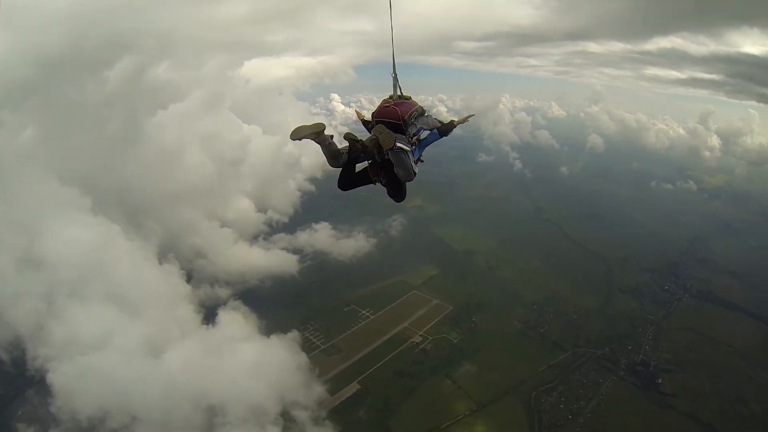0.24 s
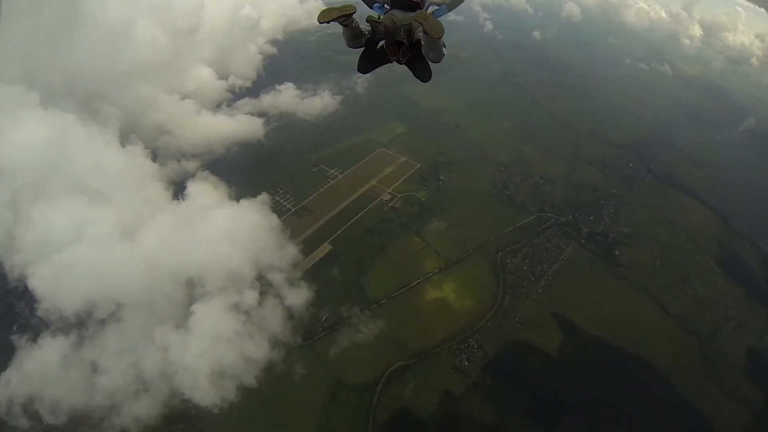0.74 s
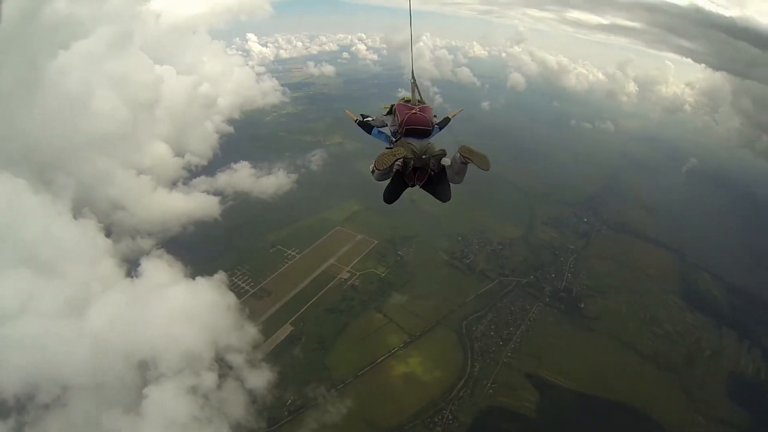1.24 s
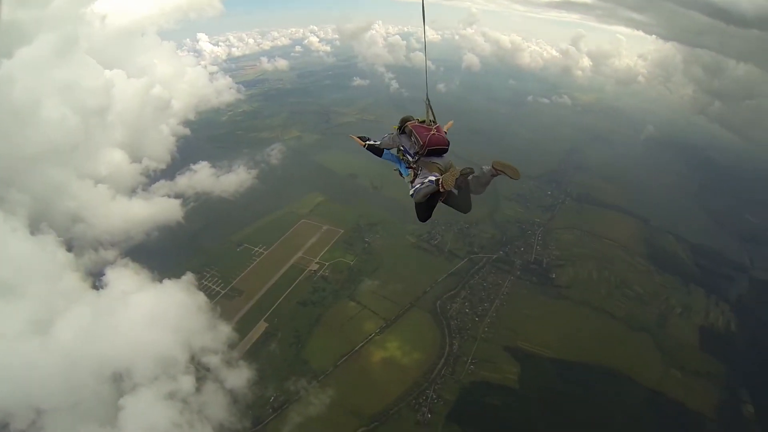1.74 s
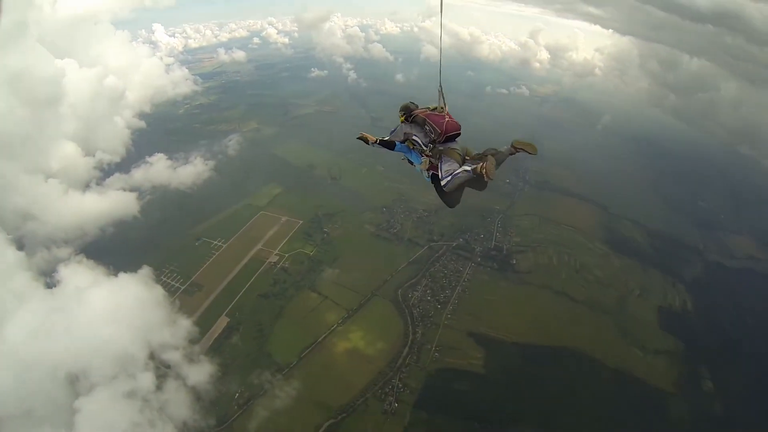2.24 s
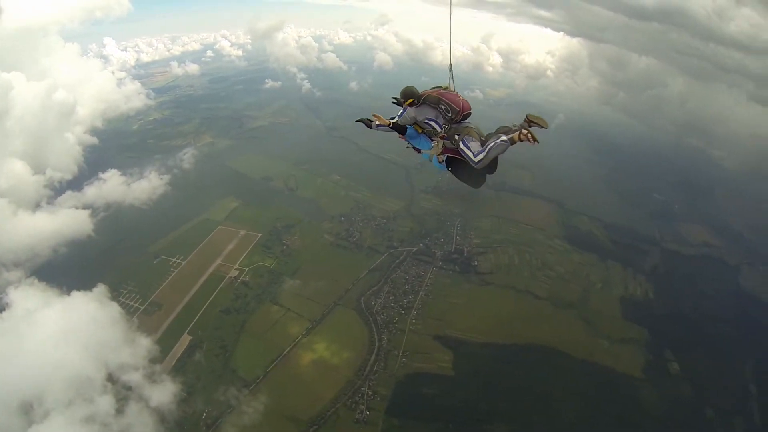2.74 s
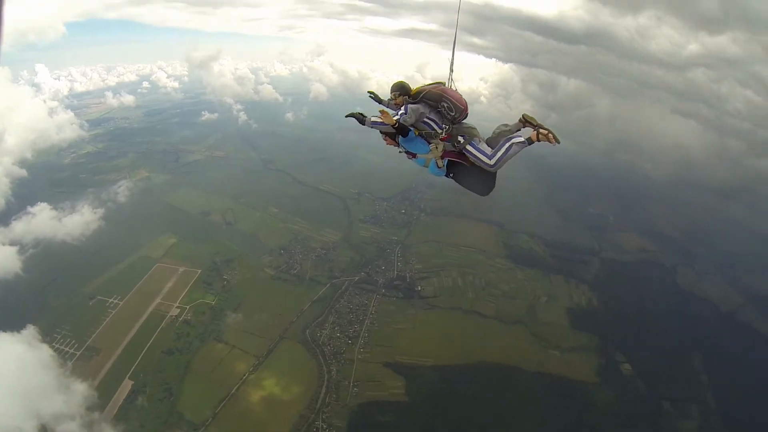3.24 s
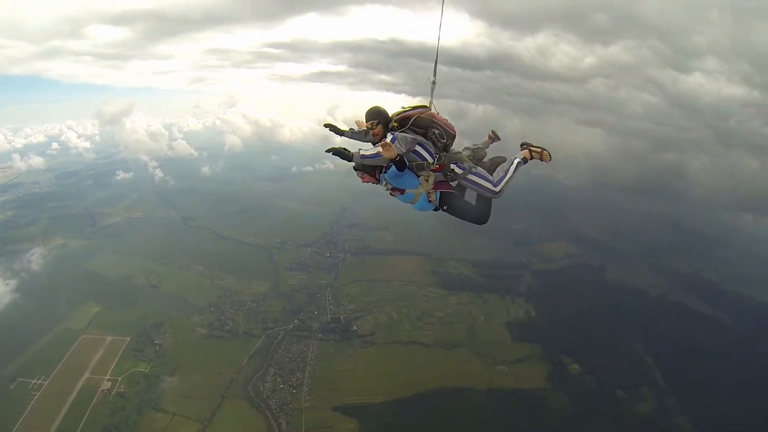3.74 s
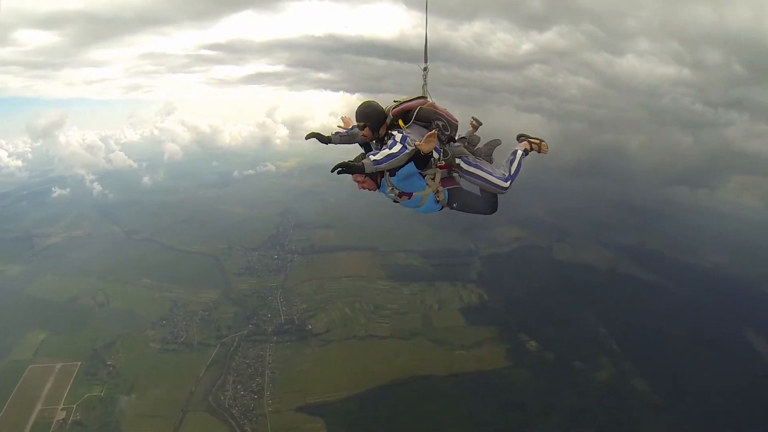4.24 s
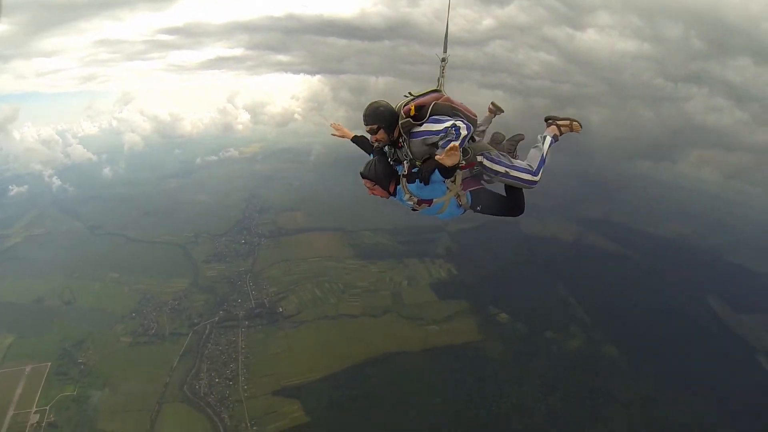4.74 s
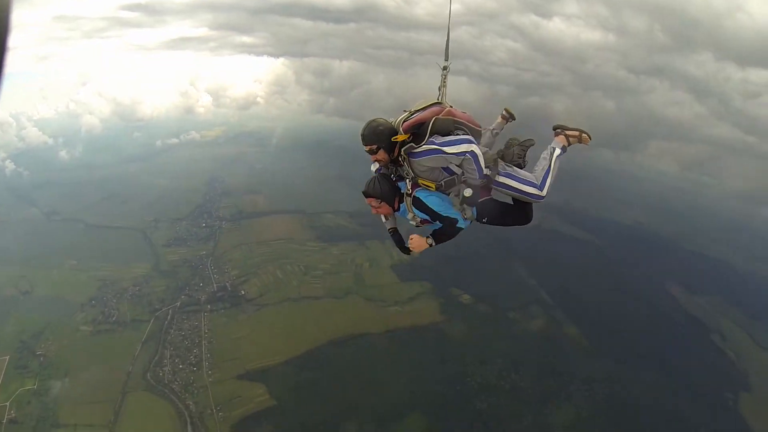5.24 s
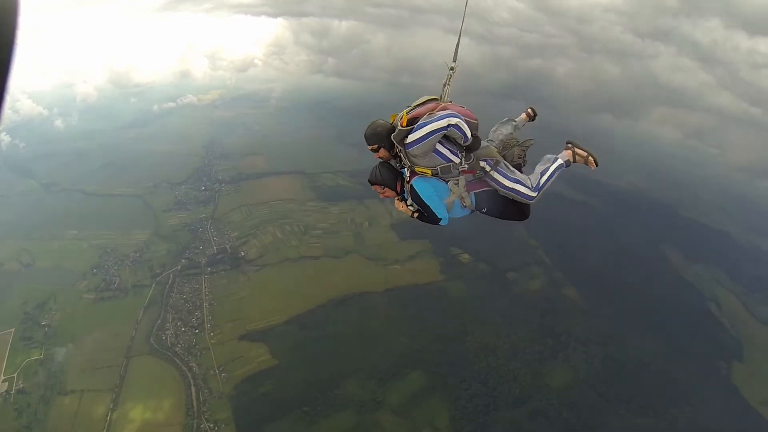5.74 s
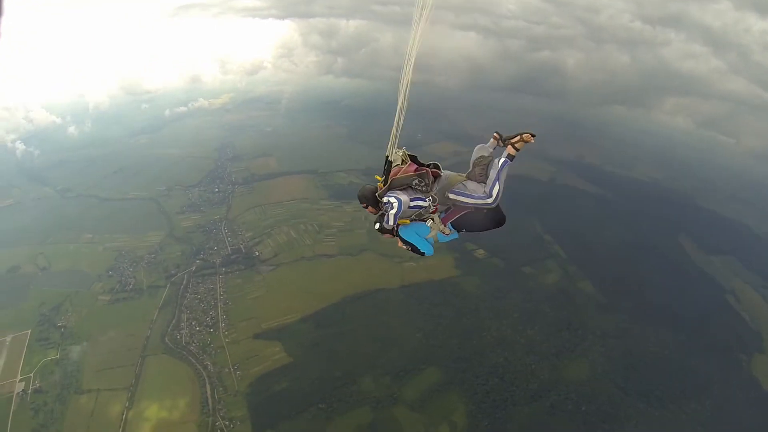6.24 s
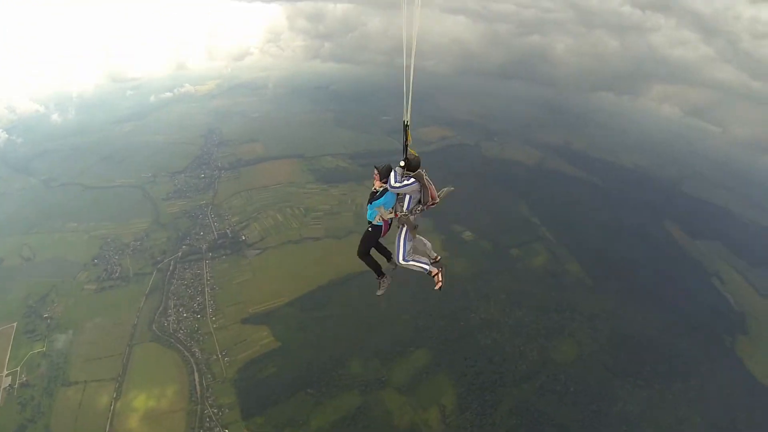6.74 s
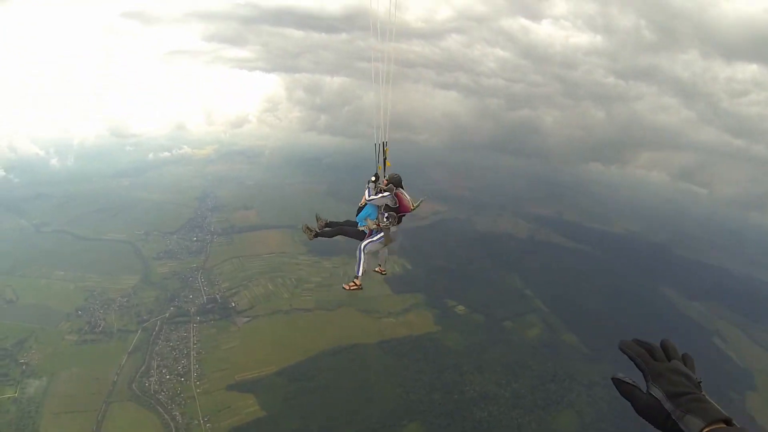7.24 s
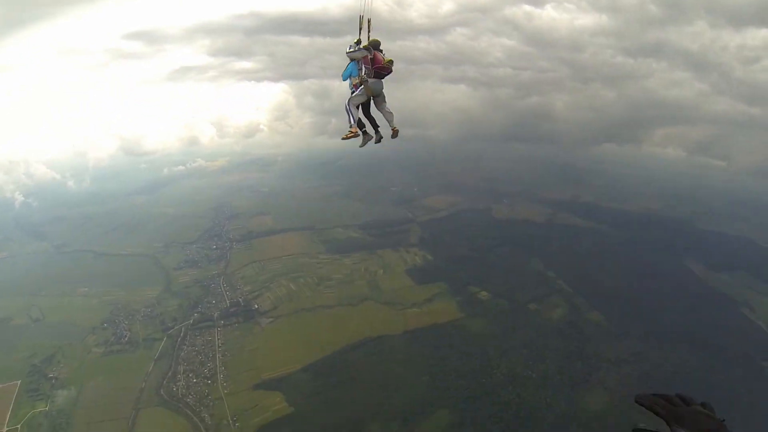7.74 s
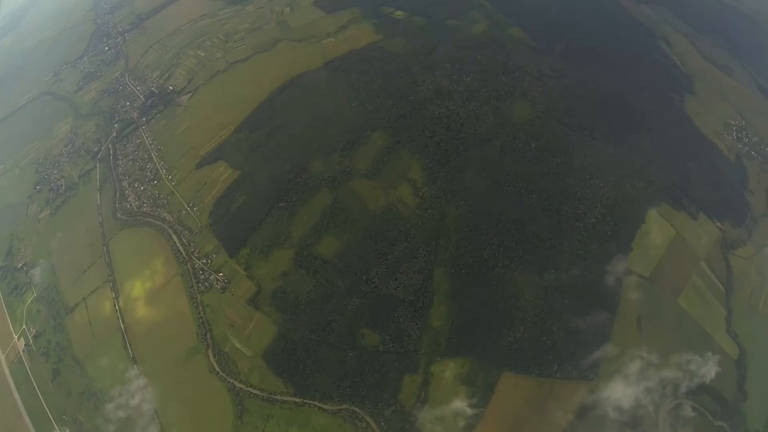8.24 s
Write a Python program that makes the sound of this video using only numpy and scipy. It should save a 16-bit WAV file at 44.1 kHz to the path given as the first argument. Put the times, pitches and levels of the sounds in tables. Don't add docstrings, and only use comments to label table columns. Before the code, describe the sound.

Constant distorted freefall wind noise, low buffeting rumble growing into a dense flattened roar, then choppier gusts and brief dropouts, with thin hiss behind.

```python
import sys
import numpy as np
from scipy import signal
from scipy.fft import rfft, irfft, next_fast_len
from scipy.io import wavfile
from scipy.ndimage import uniform_filter1d, map_coordinates

SR = 44100
rng = np.random.default_rng(int(sys.argv[2]) if len(sys.argv) > 2 else 0)


def store_pcm(level_fs):
    pcm = np.round(np.clip(level_fs, -1, 1) * 32767).astype(np.int16)
    wavfile.write(sys.argv[1], SR, np.atleast_2d(pcm).T)


def volts_from_decibels(level):
    exponent = np.asarray(level, float) / 20
    return 10 ** exponent


N = 373968

# (time [s], eddy level from hugging the port [dB], hiss level
# [dB])
FLOW = [(0.0, -19, -41), (.28, -16.5, -36), (.42, -14, -42), (.6, -15.5, -25), (1.2, -15.5, -32.5),
        (2.55, -14, -23), (3.28, -14, -33.5), (3.82, -23.5, -33.5), (4.35, -21, -35.5), (5.4, -21.5, -32.5),
        (5.8, -17.5, -33), (6.55, -15.5, -32), (6.9, -18, -32), (7.28, -22.5, -35), (7.43, -23, -50),
        (7.58, -21.5, -34.5), (8.05, -16.5, -30.5), (8.48, -22, -25.5)]
# (time [s], eddy level change [dB], length [s])
DETACHMENTS = [(.11, -4, .025), (.232, -10, 0.051), (.275, -10, 0.013), (.378, -9, 0.019),
               (3.34, -6, 0.018), (3.655, -4, 0.028), (3.8, -4, 0.013), (3.9, -4, .014), (3.94, -5, .018),
               (4.012, -8, .016), (4.13, -7, 0.018), (4.265, -7, 0.027), (4.607, -1, 0.014),
               (4.7, -4, 0.023), (5.215, -6, 0.015), (5.28, -10, 0.013), (5.522, -10, 0.022),
               (5.575, -5.5, 0.022), (6.1, -15, .015), (6.28, -3, 0.033), (7.02, -10, 0.029),
               (7.178, -9, 0.023), (7.32, -6, 0.032), (7.385, -18, 0.056), (7.455, -11.5, 0.077),
               (7.552, -19, .028), (7.703, -24, 0.042), (7.771, -19, 0.0091), (7.8, -10, 0.024),
               (7.869, -14, 0.0074)]
# (time [s], level rise [dB], length [s])
PUFFS = [(.18, 3, .025), (.44, 4, .1), (2.17, 1, 0.029), (2.45, 2.5, .05), (3.25, 4, 0.033),
         (3.515, 8, 0.017), (3.59, 4, 0.028), (3.7, 1, 0.035), (3.89, 8, 0.0098), (4.65, 7, .015),
         (4.22, 9.5, 0.023), (4.34, 0, 0.056), (4.864, 5, .023), (5.004, 0.5, .026), (5.163, 7, 0.019),
         (5.547, 8.5, 0.025), (5.672, 6.5, 0.031), (5.737, 6.5, 0.017), (5.797, 4, 0.0082),
         (6.046, 6, 0.011), (6.116, 8.5, 0.02), (6.176, 3.5, .02), (6.525, 3.5, 0.054), (7.283, 5, 0.063),
         (7.523, -3, 0.032), (7.593, 8, 0.042), (7.757, 6, 0.02), (7.783, 5, 0.011), (7.832, 6.5, 0.021),
         (8.005, 6, 0.041)]
# (frequency [Hz], density [dB per Hz])
BUFFET_SPECTRUM = [(10, -11.5), (30, -3), (70, -3), (140, -4), (260, -7.5), (500, -20.5), (1500, -63),
                   (4000, -120)]
# (frequency [Hz], density [dB per Hz])
EDDY_SPECTRUM = [(60, -40), (180, -7), (350, 0), (650, -1.5), (1100, -8), (1900, -19.5), (3000, -30),
                 (6000, -56.5), (12000, -120)]
# (frequency [Hz], density [dB per Hz])
FIZZ_SPECTRUM = [(600, -43), (1500, -4), (2200, -6), (3500, -9.5), (6000, -23.5), (9000, -22), (14000, -51),
                 (20000, -120)]
# (frequency [Hz], density [dB per Hz])
HISS_SPECTRUM = [(300, -20), (1000, 6.5), (2000, -6), (4000, -13.5), (7000, -27), (8600, -34), (10500, -26),
                 (14000, -36), (20000, -120)]
# (frequency [Hz], gain [dB])
PORT_RESPONSE = [(20, -1), (1300, -1), (1900, 2), (2600, -3), (4500, -6.5), (7500, -11.5), (8600, -10.5),
                 (9800, -16.5), (12000, -16), (14500, -25), (20000, -45)]
# (frequency [Hz], left minus right [dB])
STEREO_LEAN = [(700, 0), (1000, -.6), (1500, -1.3), (3400, -1.45), (14000, -1.45)]

HUGGING_DB = -14
FIZZ_DB, FIZZ_GROWTH = -25.5, 1.316
BUFFET_DB, BUFFET_GROWTH = -20.5, 0.61
PUFF_IN_EDDIES = 0.46


def turbulence():
    buffet_db, eddy_db, fizz_db = strengths()
    exposed = np.clip((buffet_db - eddy_db + 4.5) / 14, .1, 1.5)
    flutter_db = 0.6 * wobble(18) + 2.0 * wobble(55) + 2.04 * wobble(120)
    chop_db = detachment() + exposed * flutter_db
    return buffets(buffet_db) + eddies(eddy_db, chop_db) + fizz(fizz_db, chop_db, exposed)


def buffets(level_db):
    return volts_from_decibels(level_db + 21.5 + 1.4 * wobble(12)) * rush(BUFFET_SPECTRUM)


def eddies(level_db, chop_db):
    return volts_from_decibels(level_db + 21 + chop_db + 1.03 * wobble(30)) * rush(EDDY_SPECTRUM)


def fizz(level_db, chop_db, exposed):
    snaps_db = 5 * np.clip(wobble(290) - 1.6, 0, 1)
    bursts_db = 2.07 * wobble(90) + 1.2 * exposed * wobble(40) + snaps_db
    return volts_from_decibels(level_db + 21.5 + 0.6 * chop_db + bursts_db) * rush(FIZZ_SPECTRUM)


def strengths():
    hug_db = curves(FLOW)[0] - HUGGING_DB
    puff_db = moments(PUFFS)
    buffet_db = BUFFET_DB - BUFFET_GROWTH * hug_db
    eddy_db = HUGGING_DB + hug_db + PUFF_IN_EDDIES * puff_db
    fizz_db = FIZZ_DB + FIZZ_GROWTH * hug_db + puff_db
    return buffet_db, eddy_db, fizz_db


def detachment():
    return moments(DETACHMENTS)


def hiss():
    gust_db = uniform_filter1d(0.25 * detachment() + 0.27 * moments(PUFFS), size=1536)
    waver_db = 1.4 * wobble(16) + 0.84 * wobble(35)
    return volts_from_decibels(curves(FLOW)[1] + gust_db + waver_db) * rush(HISS_SPECTRUM)


def rush(spectrum):
    return unit(filtered(rng.standard_normal(N), lambda hz: volts_from_decibels(along(spectrum, hz))))


def wobble(rate):
    knots = rng.standard_normal(int(N * rate / SR) + 4)
    return map_coordinates(knots, [np.arange(N) * rate / SR])


def moments(rows):
    s, db, length = np.transpose(rows)[..., None]
    t = np.arange(0, N / SR, .001)
    bumps = db * np.exp(-((t - s) / (length / 2)) ** 6)
    return np.interp(np.arange(N) / SR, t, bumps.sum(axis=0))


def curves(rows):
    s, *columns = np.transpose(rows)
    return [np.interp(np.arange(N) / SR, s, column) for column in columns]


def filtered(x, response):
    m = next_fast_len(N + 8192)
    return irfft(rfft(x, m) * response(np.fft.rfftfreq(m, 1 / SR)), m)[..., :N]


def along(points, hz):
    f, v = np.transpose(points)
    return np.interp(np.log(hz + 1), np.log(f + 1), v)


def unit(x):
    return x / np.sqrt(np.mean(x ** 2) + 1e-20)


def scene():
    return np.tile(turbulence(), (2, 1))


def low_pass(x):
    return signal.sosfilt(signal.butter(12, 14300, fs=SR, output="sos"), x)


def record(dry, knee=1.53, bias=0.18, give=0.062, cut_hz=70, top_db=-8):
    pressure = dry + bias
    flattened = pressure / (1 + np.abs(pressure) ** knee) ** (1 / knee)
    wave = (flattened + give * pressure) * volts_from_decibels(top_db)

    def port(hz):
        low_cut = 1j * hz / (cut_hz + 1j * hz)
        return low_cut * volts_from_decibels(along(PORT_RESPONSE, hz))

    mix = filtered(wave - wave.mean(), port) + hiss()
    sides = np.array([[1], [-1]]) / 2
    mix = filtered(mix, lambda hz: volts_from_decibels(sides * along(STEREO_LEAN, hz)))
    return low_pass(mix)


dry = scene()
out = record(dry)
store_pcm(out)
```